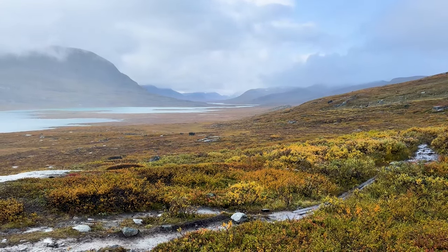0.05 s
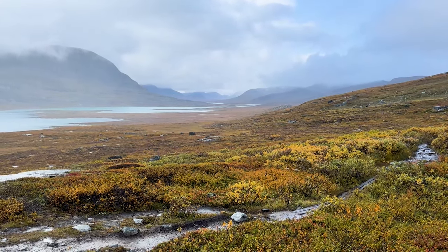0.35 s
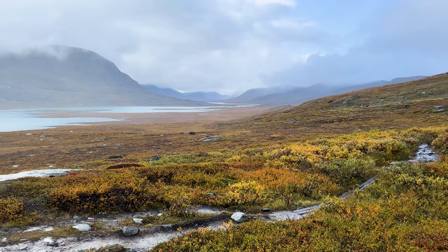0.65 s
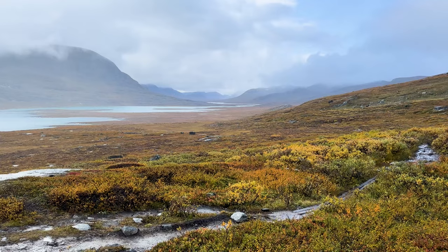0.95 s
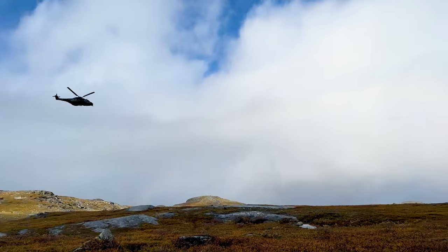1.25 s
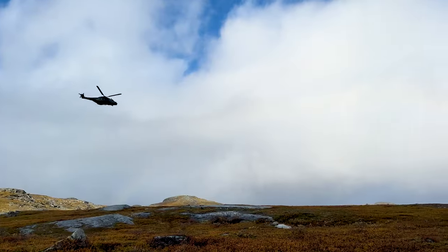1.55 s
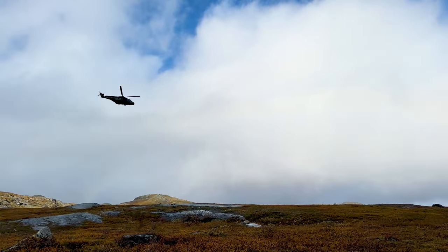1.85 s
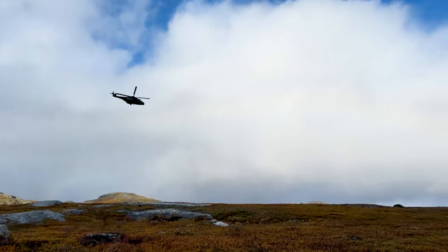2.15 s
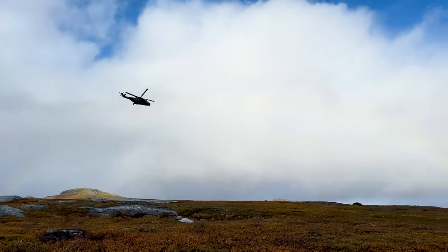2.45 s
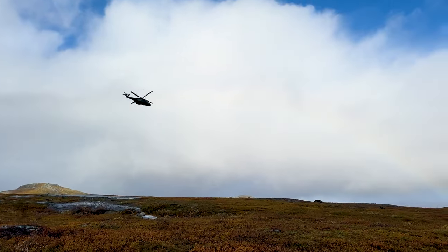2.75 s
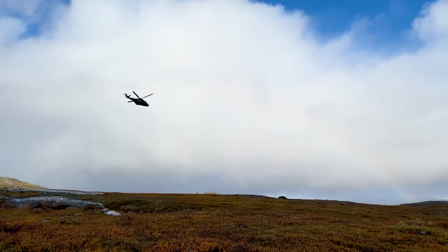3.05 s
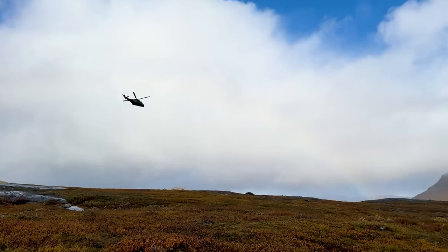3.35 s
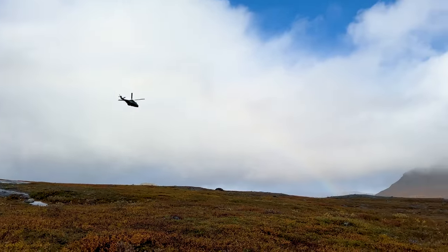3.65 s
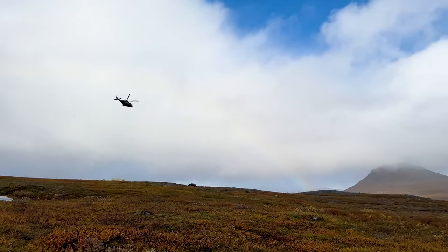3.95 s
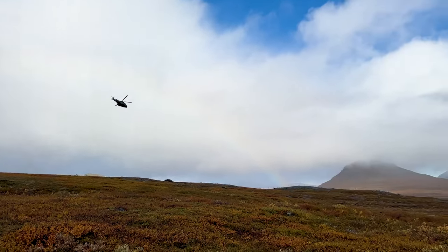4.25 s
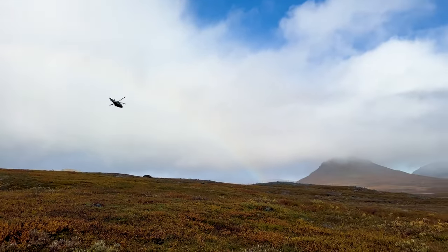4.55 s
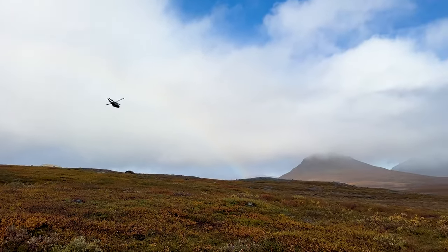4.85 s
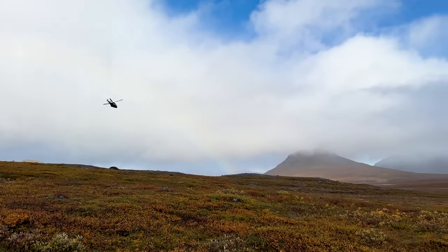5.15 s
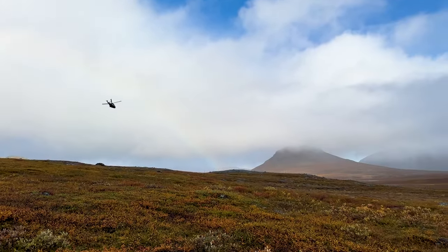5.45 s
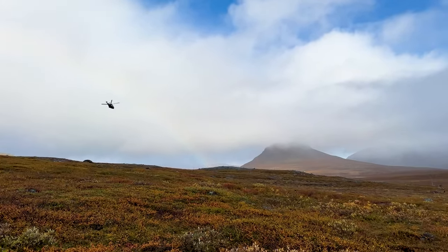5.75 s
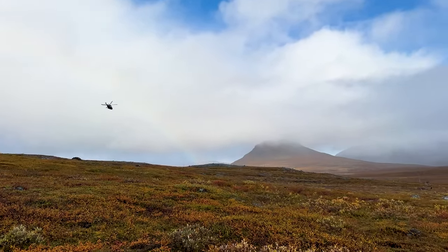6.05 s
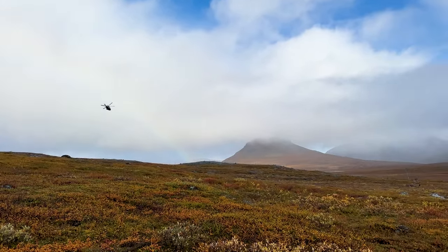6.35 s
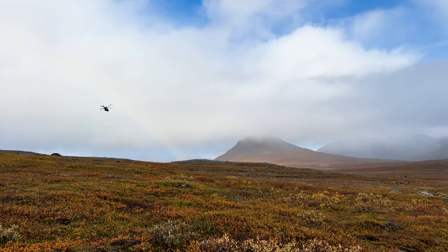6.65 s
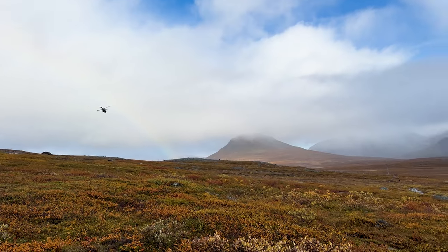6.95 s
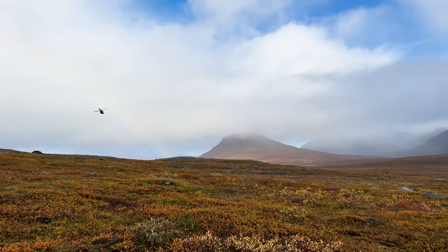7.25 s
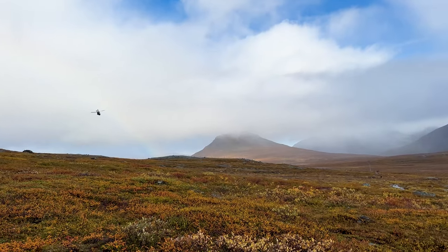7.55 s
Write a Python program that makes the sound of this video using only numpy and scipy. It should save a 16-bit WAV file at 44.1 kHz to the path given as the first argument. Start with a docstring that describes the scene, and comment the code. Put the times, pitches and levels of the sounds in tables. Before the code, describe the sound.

A helicopter passes over open country with a rotor buzz and swishing blades, growing duller and fainter under gusty wind rumble.

```python
"""Helicopter fly-by on a windy moor

Wind buffets a handheld stereo microphone; abruptly a helicopter is there, flying past and away.
Its tail rotor buzzes, its wake roars and the main blades swish, sinking in pitch and dulling with
distance. Engine tones swell in turn, and short echoes off body and ground hollow the sound.
Gusts keep rumbling on the microphone's two ports, over a faint crackle of heath."""
import sys
import numpy as np
from scipy import signal
from scipy.fft import rfft, irfft
from scipy.io import wavfile
from scipy.ndimage import uniform_filter1d

SR = 44100
rng = np.random.default_rng(int(sys.argv[2]) if len(sys.argv) > 2 else 0)


def dump(signal):
    """Clip the signal to [-1, 1] and save it as 16-bit WAV at the path in sys.argv[1]."""
    limited = np.clip(np.atleast_2d(signal).T, -1, 1)
    pcm = np.round(limited * 32767).astype(np.int16)
    wavfile.write(sys.argv[1], SR, pcm)


N = 343098
T = np.arange(N) / SR
ARRIVAL_S = 1.172  # the helicopter cuts in
SPEED_M_S, CLOSEST_M, CLOSEST_S, SOUND_M_S = 81.22, 221.19, 1.8741, 343
BLADE_HZ, TAIL_RATIO = 17.348, 4.8242  # main blade rate at the source; tail blades per main blade

# Fader rides as the sound swells and fades through moving air: t/s, rotors/dB, hiss and whistles/dB
FADING = [(1.2, 3.5, -3.5), (1.5, 2.5, -4.5), (1.7, 1.5, -1.5), (1.92, 4.5, -2.5), (2.3, 1.5, 1.5),
          (2.6, -1, -5), (2.95, -1.5, -3), (3.22, 0, -5.5), (3.38, -1.5, 1.5), (3.62, -1, 4), (3.9, -2, -3),
          (5.3, -1.5, -0.5), (5.6, 1.5, -2.5), (6.45, 1.5, 2.5), (7.2, 2, 1), (7.78, -1, -5)]
# Swish depth, shallowest with the helicopter abeam: t/s, depth/dB
SWISH = [(1.45, 5), (1.9, 2), (2.6, 2), (3.1, 4), (4.2, 4), (4.8, 6.5), (5.8, 4.5), (7.0, 4.5), (7.5, 6.5)]
def helicopter():
    """Rotors, blade hiss and engines, mixed along the flight path and heard at the ports."""
    metres, degrees, passages = flight()
    rotor_db, hiss_db = curves(FADING)
    swish_db = curves(SWISH)[0]

    def beam(db, aim_deg, half_power_deg):
        """Gain of a broad beam, weaker off its aim and with distance."""
        return undb(db) * bell(degrees, aim_deg, half_power_deg) * CLOSEST_M / metres

    rotors = beam(-27.7, 76, 26) * tail_buzz(passages)
    rotors += beam(-42, 100, 24) * tail_rasp(passages)
    roar, body = wake(passages, degrees, swish_db)
    rotors += beam(-33, 71.2, 37) * roar + beam(-26.5, 112.9, 13.6) * body
    thump = undb(-49) * blade_thump(passages, metres)
    hiss = beam(-46.5, 84.5, 38.9) * blade_hiss(passages, swish_db, metres)
    whistles, tones = engines(passages)
    airborne = undb(rotor_db) * rotors + undb(hiss_db) * (hiss + whistles)
    mix = sinking_colour(airborne, passages) + blade_cracks() + thump + tones
    return at_ports(mix) * np.clip((T - ARRIVAL_S) / 0.0023, 0, 1)


def flight():
    """Straight, level pass: distance, angle from the nose and Doppler-bent count of blade passages."""
    mach = SPEED_M_S / SOUND_M_S
    track_m = SPEED_M_S * (T - CLOSEST_S) + mach * CLOSEST_M
    squeeze = 1 - mach ** 2
    metres = (np.sqrt(track_m ** 2 + squeeze * CLOSEST_M ** 2) - mach * track_m) / squeeze
    degrees = np.degrees(np.arctan2(CLOSEST_M, mach * metres - track_m))
    return metres, degrees, .092 + BLADE_HZ * (T - metres / SOUND_M_S)


# Tail slap EQ, heavy in the low mids: f/Hz, level/dB
BUZZ_EQ = [(50, -15), (87, -12), (160, -18.5), (235, 11), (340, 8), (440, 0.5), (530, 0), (630, 3),
           (780, -3.5), (1000, -6.5), (1350, -17.5), (1800, -21), (2300, -32), (4000, -31.5)]
def tail_buzz(passages):
    """Each tail blade slaps twice, with a puff of torn air, swelling as the main wake sweeps through."""
    tail = passages * TAIL_RATIO
    pulses = blade_pulses(tail, scatter_db=1.1, jitter_ms=0.04)[None]
    period_ms = 1000 / (np.gradient(tail) * SR)
    pulses = unit(pulses + .4 * delay(pulses, period_ms / 4))  # cutting the last blade's tip vortex
    puffs = unit(beat(tail, sharp=6) * noise(apart=0.25))
    slaps = (pulses + undb(-10) * puffs) * undb(2.5 * beat(passages, sharp=1.1))
    return unit(smear(colour(slaps, BUZZ_EQ)))


# Torn-air EQ, a midrange bark: f/Hz, level/dB
RASP_EQ = [(250, -12), (520, 7.5), (800, -1), (1150, -8), (1400, -11), (1750, -12.5), (2600, -19.5)]
def tail_rasp(passages):
    """A short burst of torn air from each tail blade, never twice the same size."""
    bursts = beat(passages * TAIL_RATIO, sharp=11) * undb(2 * np.tanh(walk(80)))
    return unit(smear(colour(bursts * noise(apart=0.16), RASP_EQ)))


def smear(x):
    """An all-pass makes the mids of each slap late, drawing it out into a few swings."""
    b, a = signal.iirpeak(560, Q=1.6, fs=SR)
    return x - 2 * signal.lfilter(b, a, x)


# EQs of the wake's broad roar and its deep body: f/Hz, level/dB
ROAR_EQ = [(120, -4.5), (220, 5), (380, 4.5), (480, 5), (600, 5), (800, 0.5), (900, 0.5), (1060, 3.5),
           (1290, -9.5), (1480, -6.5), (1750, -11), (2250, -21.5), (3200, -23.5)]
LOW_WAKE_EQ = [(60, -13), (115, -9.5), (160, -9.5), (215, 3), (320, -3.5), (450, -12), (650, -12),
               (1000, -34.5)]
def wake(passages, degrees, swish_db):
    """Turbulent roar and its deep body, throbbing with the blades and wavering in the wind."""
    throb = undb(0.4 * swish_db * beat(passages, sharp=1.6))
    approach = np.clip((128 - degrees) / 36, 0, 1)  # 0 once it is well past
    tail_chop = undb(8 * approach * (beat(passages * TAIL_RATIO - .1, sharp=1.5) - .55))
    roar = unit(colour(noise(apart=0.35) * tail_chop, ROAR_EQ) * throb * undb(1.4 * walk(70)))
    body = unit(colour(noise(apart=.35), LOW_WAKE_EQ) * throb * undb(walk(25)))
    return roar, body


# Blade-tip EQ, bright and airy: f/Hz, level/dB
HISS_EQ = [(800, -20), (1300, 7.5), (1700, 6), (2250, 3.5), (2700, 3.5), (3200, 4.5), (3800, 0), (4400, 1),
           (5100, -1.5), (5900, -3.5), (6700, -12.5), (7200, -9), (8400, -18), (10500, -23.5), (12000, -41)]
def blade_hiss(passages, swish_db, metres):
    """Blade tips hiss once a passage, just ahead of the thump, chopped finely by the tail rotor."""
    swish = beat(passages + .05, sharp=2.2)
    chop_db = 5.9 * (CLOSEST_M / metres) ** 2 * beat(passages * TAIL_RATIO, sharp=0.21)
    envelope = undb(swish_db * swish + chop_db + 1.7 * walk(90))
    hiss = unit(colour(noise(apart=.4) * envelope, HISS_EQ))
    return through_air(hiss, metres)


# Thump EQ, all bass: f/Hz, level/dB
THUMP_EQ = [(18, -14), (35, -8), (55, -4.5), (100, 3), (160, -3), (300, -19.5)]
def blade_thump(passages, metres):
    """One soft pressure pulse per main blade, fading fast with distance."""
    pulses = blade_pulses(passages, scatter_db=0, jitter_ms=0.19)
    return (CLOSEST_M / metres) ** 4.5 * unit(colour(pulses, THUMP_EQ))


# Crack cues: t/s, level/dB
BLADE_CRACKS = [(2.049, -22.5), (2.073, -19.5), (2.134, -18), (2.219, -17), (2.318, -30), (2.914, -16),
                (2.953, -25), (2.977, -21.5), (3.123, -24), (3.189, -20.5), (3.227, -21.5), (3.386, -21),
                (3.644, -26.5), (3.678, -31)]
# Crack EQ, a hard midrange knock: f/Hz, level/dB
CRACK_EQ = [(150, -26.5), (350, -12.5), (600, 7.5), (1150, -3), (1500, -9.5), (2300, -20), (4000, -34)]
def blade_cracks():
    """Now and then a blade hits a vortex squarely and cracks out of the rasp."""
    clicks = np.zeros(N)
    for s, db in BLADE_CRACKS:
        clicks[int(s * SR)] = undb(db)
    cracks = colour(clicks, CRACK_EQ)
    return cracks * clicks.max() / np.abs(cracks).max()


# Compressor whistles and lower engine tones: source f/Hz, width/Hz, level/dB, peak t/s, to half power/s
WHISTLES = [(11050, 300, -82, 2.0, 1.1), (8400, 220, -86, 4.1, .7)]
ENGINE_TONES = [(1770, 90, -50.5, 2.3, 0.29), (2290, 46, -59, 6.1, 0.49), (2574, 140, -62, 5.7, 0.68),
                (2820, 83, -62, 9.3, 0.6), (3740, 210, -57, 2.27, 0.28), (7360, 200, -84, 2.1, .5)]
def engines(passages):
    """Whistles and tones: unsteady narrow bands that sink in pitch, each beamed past in its turn."""
    def tone(hz, width_hz, db, peak_s, half_s):
        source_s = passages / BLADE_HZ + .003 * np.cumsum(walk(12)) / SR  # the pitch wanders
        band = narrow_band(2 * np.pi * hz * source_s, width_hz)
        return unit(band * undb(3 * walk(17))) * undb(db) * bell(T, peak_s, half_s)

    return sum(tone(*row) for row in WHISTLES), sum(tone(*row) for row in ENGINE_TONES)


# Swept EQ bells on the rotor noise: source f/Hz, width/Hz, gain/dB, peak t/s, to half strength/s
SWEPT_BELLS = [(286, 110, -6.5, 1.1, 1.6), (757, 77, -5, 2, 1), (890, 130, 0.5, 1.2, 1.2),
               (1380, 280, 2.5, 2.2, 0.92), (1620, 100, 0, 2.5, 0.68), (1760, 180, 5, 2.3, 1.6),
               (2050, 150, -1, 2.3, .8), (2560, 670, 2.5, 1.4, 1.3), (3120, 270, 7.5, 2.4, 0.76),
               (3400, 130, -1, 2.1, .5), (1240, 140, 5.5, 3.55, 0.35), (960, 56, 3, 6.2, 0.89)]
def sinking_colour(x, passages):
    """Humps and hollows show in turn and slide down with the pitch of the rotors."""
    hz, s, frames = signal.stft(x, SR, nperseg=1024, noverlap=768)
    doppler = np.interp(s, T, np.gradient(passages) * SR / BLADE_HZ)
    source_hz = hz[:, None] / doppler
    gain_db = sum(db * .5 ** ((2 * (source_hz - centre) / width) ** 2 + ((s - at) / half) ** 2)
                  for centre, width, db, at, half in SWEPT_BELLS)
    return signal.istft(frames * undb(gain_db), SR, nperseg=1024, noverlap=768)[1][:, :N]


def through_air(x, metres, tilt_db_per_m=0.0483):
    """Air swallows the treble with distance: a tilt that pivots on 4 kHz."""
    hz, s, frames = signal.stft(x, SR, nperseg=512)
    further_m = np.interp(s, T, metres - CLOSEST_M)
    loss_db = tilt_db_per_m * further_m * ((hz[:, None] / 4000) ** 2 - 1)
    return signal.istft(frames * undb(-loss_db), SR)[1][:, :N]


# Echo taps off the slope: lag/ms, gain
GROUND_ECHOES = [(3.8, .14), (4.25, -.35)]
# Echo off the holder, turning with the flight: t/s, left lag/ms, right lag/ms, left gain, right gain
BODY_ECHO = [(1.2, 2.06, 1.63, 0.67, 0.61), (1.7, 2.17, 1.66, 0.34, 0.45), (2.1, 2.33, 1.68, 0.51, 0.21),
             (2.6, 2.31, 1.67, 0.42, 0.18), (3.2, 2.58, 1.65, 0.31, 0.34), (3.8, 2.83, 1.8, 0.27, 0.19),
             (4.5, 2.98, 1.8, 0.55, 0.053), (5.4, 2.46, 2.08, 0.11, 0.34), (7.8, 3.15, 2.05, 0.22, 0.67)]
# Stereo tilt of ports that face different ways, shared out unevenly: f/Hz, leftward tilt/dB
PORT_TILT = [(60, -7), (200, 2), (380, -1.5), (700, 8), (1290, 1.5), (2380, 0), (4400, 1.5), (8120, 6),
             (22000, -20.5)]
def at_ports(heard):
    """Ground and body add dull echoes; each port has its own colour, and the right one hears later."""
    left_ms, right_ms, left_gain, right_gain = curves(BODY_ECHO)
    dull = signal.sosfiltfilt(signal.butter(1, 3600, fs=SR, output="sos"), heard)
    grazing = np.clip(T - 3.6, 0, 1)  # the slope answers once the sound comes in low
    heard = heard + grazing * sum(gain * delay(dull, ms) for ms, gain in GROUND_ECHOES)
    left = heard[:1] + left_gain * delay(dull[:1], left_ms)
    right = round_casing(heard[1:] + right_gain * delay(dull[1:], right_ms))
    return np.vstack([colour(left, PORT_TILT, share=0.47), colour(right, PORT_TILT, share=-0.76)])


# Phase twist at the right port: f/Hz, extra lag/rad
PORT_PHASE = [(0, 0), (450, -.35), (800, .5), (1000, -.6), (1300, 1), (1550, -.1), (1780, .5), (2000, -.7),
              (2200, -1.9), (2350, -2), (2550, -1), (3050, -.8), (3500, .4), (4500, .5), (6000, .8),
              (6900, -1.4), (9000, 0)]
def round_casing(x):
    """Sound bends round the casing to the right port: a short lag that differs with frequency."""
    hz = np.arange(N // 2 + 1) * SR / N
    twist = np.interp(hz, *np.transpose(PORT_PHASE))
    return irfft(rfft(delay(x, ms=0.22)) * np.exp(-1j * twist), N)


# Gust fader ride: t/s, level/dB
GUSTS = [(0, -43), (.22, -43), (.32, -27), (.55, -33.5), (.68, -35.5), (.95, -33), (1.17, -24.5),
         (1.45, -29), (2.1, -36), (2.5, -29.5), (2.9, -40.5), (3.3, -37.5), (3.85, -32.5), (4.4, -37),
         (4.95, -37), (5.35, -53.5), (5.6, -53.5), (5.8, -39.5), (6.15, -48), (6.52, -45.5), (6.75, -41),
         (7.42, -49), (7.78, -43)]
# EQs of the deep rumble, the flutter above it and the eddy slaps: f/Hz, level/dB
RUMBLE_EQ = [(18, -27), (30, -11), (45, -9.5), (62, 1), (95, -2), (140, -7), (220, -14.5), (400, -29)]
FLUTTER_EQ = [(50, -13.5), (130, 1), (220, -2), (330, -4), (500, -14), (750, -23.5), (1000, -38),
              (1400, -52), (2000, -62.5), (4000, -70)]
EDDY_EQ = [(80, -1.5), (200, 1), (400, -0.5), (600, -4), (800, -14.5), (1100, -33), (1450, -38),
           (2000, -53), (3500, -74)]
def wind():
    """Gusts rumble on the ports and make them sing faintly; eddies flutter and strike as buffets."""
    slaps, thuds, kicks = eddy_pushes()
    gust = np.hypot(undb(curves(GUSTS)[0] + 1.83 * walk(9.3)), thuds)
    rumble = unit(colour(noise(apart=0.36), RUMBLE_EQ))
    slow_power = uniform_filter1d(np.mean(rumble ** 2, axis=0), size=4000)
    rumble /= np.sqrt(slow_power)  # the gust alone sets the slow level
    # the microphone turns across the wind: spurts run together into a louder, steadier flutter
    turned = np.clip(.5 + (T - 4.26) / 0.2, 0, 1)
    spurts = .1 + np.clip(walk(80) - .2, 0, 1.6)
    sputter = (spurts + turned * (.38 - .55 * spurts)) * undb(1.6 * np.tanh(walk(22)))
    flutter = undb(-7.5 + 8 * turned) * unit(colour(noise(apart=0.23) * sputter, FLUTTER_EQ))
    air = noise(apart=0.49)
    buffets = colour(slaps * air, EDDY_EQ) / np.std(colour(air, EDDY_EQ))
    port_song = undb(-68) * narrow_band(2 * np.pi * 9600 * T, width_hz=350)
    return gust * (rumble + flutter + port_song) + undb(-7) * buffets + undb(-6) * kicks


# Cues for single eddies hitting the ports: t/s, relative level/dB, rise/s
BUFFETS = [(.04, -37, 0.02), (.074, -27, 0.0031), (0.093, -37, 0.0021), (.279, -27, 0.0017),
           (.287, -28.5, .002), (.3, -32, 0.01), (.317, -30, 0.0023), (.34, -31, 0.0026),
           (0.377, -27, 0.032), (.413, -22, 0.0024), (0.447, -29, 0.0024), (.461, -29.5, 0.0024),
           (.496, -30, 0.0032), (.552, -32, 0.0044), (0.589, -21.5, 0.003), (.627, -32, 0.0027),
           (.708, -31.5, .003), (.754, -27, 0.0029), (.775, -26.5, 0.029), (0.804, -15, 0.0021),
           (.87, -23, 0.0024), (.927, -27.5, 0.0031), (.978, -28.5, 0.003), (1.003, -27, 0.027),
           (1.007, -21.5, 0.0024), (1.027, -23.5, .0024), (1.061, -24, 0.0022), (1.093, -14, 0.0017),
           (1.106, -14, 0.00237), (1.12, -22, 0.001), (1.149, -24, 0.0033), (1.229, -8, 0.0019),
           (2.19, -28, 0.027), (2.34, -34, 0.027), (3.061, -29, 0.028), (3.53, -31, 0.0088),
           (3.659, -33, 0.031), (4.258, -22, 0.0074), (4.321, -28, 0.026), (4.351, -25, 0.0035),
           (4.472, -22, 0.0072), (4.558, -23.5, 0.0076), (4.672, -24.5, 0.0079), (5.69, -37, 0.016),
           (5.748, -24, 0.0026), (5.792, -31, 0.003), (5.882, -19, 0.0046), (5.909, -20.5, 0.0049),
           (5.999, -43, 0.0041), (6.096, -40, 0.0039), (6.359, -38.5, 0.023), (6.43, -32, 0.0046),
           (6.468, -35, 0.0045), (6.6, -34, 0.017), (6.626, -25.5, .004), (6.645, -27, 0.0033),
           (6.724, -21.5, 0.0018), (6.766, -34, 0.0065), (6.85, -25.5, 0.0039), (6.87, -42, 0.023),
           (7.081, -32, 0.0069), (7.26, -25.5, 0.0037), (7.275, -26, 0.0029), (7.6, -36.5, .02)]
def eddy_pushes(slap_rise_s=0.0071, kick_cycles=0.7):
    """Envelopes of small eddies that slap and large ones that thud, and each slap's pressure kick."""
    slaps, thuds, kicks = np.zeros((3, N))
    for s, db, rise_s in BUFFETS:
        span = slice(int(s * SR), int(s * SR) + SR // 2)
        age = np.maximum(T[span] - s, 0) / rise_s
        push = undb(db) * age * np.exp(1 - age)
        small = 1 / (1 + (rise_s / slap_rise_s) ** 4)
        slaps[span] += small * push
        thuds[span] += (1 - small) * push
        swing = 2 * np.pi * kick_cycles * (age - 1)
        kicks[span] += small * push * swing * np.exp(.5 - .5 * swing ** 2)
    return slaps, thuds, kicks


# Air bed EQ, thin and bright: f/Hz, level/dB
AIR_EQ = [(300, -17), (1000, -6.5), (2500, 1), (7000, -8.5), (9000, -14), (11000, -30.5)]
def heath():
    """Twigs crackle faintly over a hush of air; the bed drops as the helicopter cuts in."""
    chance, size = rng.random((2, N))
    twigs = (chance < 45 / SR) * undb(-4.5 * np.log(size + .04))
    snap_decay = np.exp(-np.arange(400) / SR / 0.0018)
    crackle = unit(signal.oaconvolve(twigs, snap_decay)[:N])
    rustle = unit(colour(noise(apart=0.66) * (0.5 + crackle), AIR_EQ))
    return rustle * undb(np.where(T < ARRIVAL_S, -77, -95))


# Tick cues: t/s, relative level/dB, decay/s, dullness (share of the EQ)
TICKS = [(1.168, -33, 0.00058, 0.28), (1.445, -29.5, 0.0086, 0.99)]
# Tick EQ, rolling off above the mids: f/Hz, level/dB
TICK_EQ = [(300, -18), (1000, 8.5), (3500, -7.5), (5500, -14.5), (8000, -26), (12000, -41), (16000, -54)]
def dry_ticks():
    """Two fast-dying bursts of noise, one sharp and one dull."""
    snap = noise(apart=0.49)
    ticks = np.zeros((2, N))
    for s, db, decay_s, dullness in TICKS:
        envelope = undb(db) * (T >= s) * np.exp(-np.maximum(T - s, 0) / decay_s)
        ticks += colour(envelope * snap, TICK_EQ, share=dullness)
    return ticks


def blade_pulses(passages, scatter_db, jitter_ms):
    """One click for each passing blade, scattered in size and timing."""
    at = np.flatnonzero(np.diff(np.floor(passages)))
    timing, size = rng.standard_normal((1000, 2))[:len(at)].T
    at += (timing * jitter_ms * SR / 1000).astype(int)
    clicks = np.zeros(N)
    clicks[np.clip(at, 0, N - 1)] = undb(scatter_db * size)
    return unit(clicks)


def beat(passages, sharp):
    """A smooth bump up to 1 at each blade passage."""
    return np.exp(sharp * (np.cos(2 * np.pi * passages) - 1))


def bell(x, centre, half):
    """Gain of 1 at the centre, down to half power at centre +/- half."""
    return .5 ** (.5 * ((x - centre) / half) ** 2)


def narrow_band(phase, width_hz):
    """Noise gathered closely round a tone."""
    return unit(walk(2 * width_hz) * np.cos(phase) + walk(2 * width_hz) * np.sin(phase))


def colour(x, eq, share=1, size=8192):
    """Minimum-phase EQ; the curve falls 30 dB an octave past its last point, and share scales it."""
    hz = np.arange(size // 2 + 1) * SR / size
    f, db = np.transpose(eq)
    curve_db = np.interp(np.log(hz + 1), np.log(f), db) - 30 * np.log2(np.maximum(hz / f[-1], 1))
    cepstrum = irfft(np.log(undb(share * curve_db)))
    cepstrum[1:size // 2] *= 2
    cepstrum[size // 2 + 1:] = 0
    response = irfft(np.exp(rfft(cepstrum))) * np.hanning(2 * size)[size:]
    return signal.oaconvolve(np.atleast_2d(x), response[None], axes=1)[:, :N]


def noise(apart):
    """Stereo white noise; apart is the ratio of side to mid."""
    mid, side = rng.standard_normal((2, N))
    return unit(mid + apart * side * np.array([[1], [-1]]))


def walk(rate_hz):
    """Random sample-and-hold, slewed twice, at rms 1."""
    hold = int(SR / rate_hz)
    steps = np.repeat(rng.standard_normal(N)[:N // hold + 1], hold)
    return unit(uniform_filter1d(uniform_filter1d(steps, hold), hold)[:N])


def delay(x, ms):
    """Channels heard later by a fixed or moving lag."""
    return np.array([np.interp(T - ms / 1000, T, channel) for channel in x])


def curves(table):
    """Each column of a timed table as an automation lane."""
    s, *columns = np.transpose(table)
    return [np.interp(T, s, column) for column in columns]


def undb(db):
    """Decibels to gain."""
    return 10 ** (np.asarray(db) / 20)


def unit(x):
    """Scale to rms 1."""
    return x / np.sqrt(np.mean(x ** 2))


def scene():
    """Helicopter up front, wind on the microphone, heath and ticks behind."""
    return helicopter() + wind() + heath() + undb(9.5) * dry_ticks()


def record(dry):
    """The recorder drops the deepest rumble and cuts the top."""
    dry = signal.sosfilt(signal.butter(4, 33, "high", fs=SR, output="sos"), dry)
    return signal.sosfilt(signal.ellip(8, .2, 70, 16600, fs=SR, output="sos"), dry)


dry = scene()
out = record(dry)
dump(out)
```